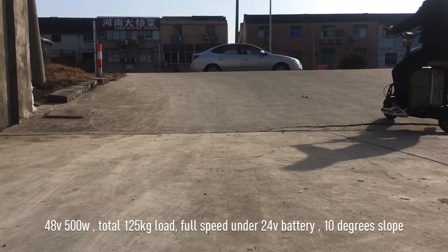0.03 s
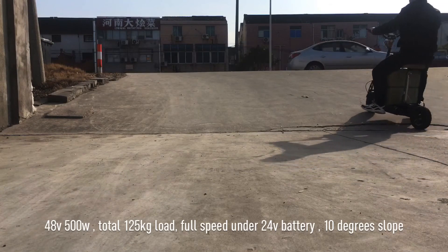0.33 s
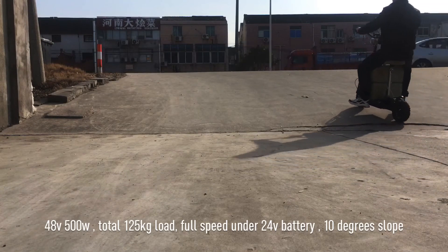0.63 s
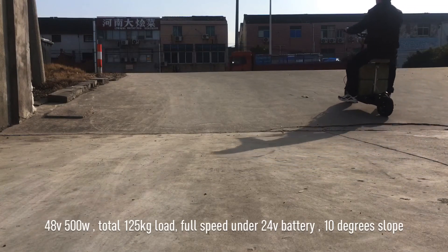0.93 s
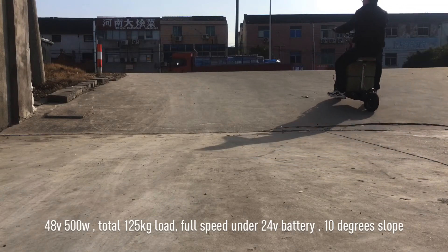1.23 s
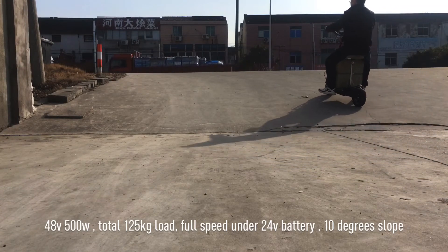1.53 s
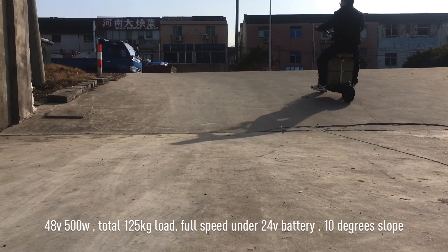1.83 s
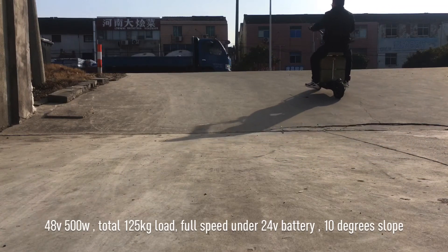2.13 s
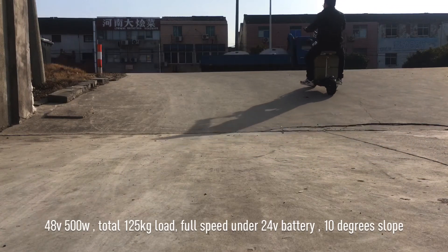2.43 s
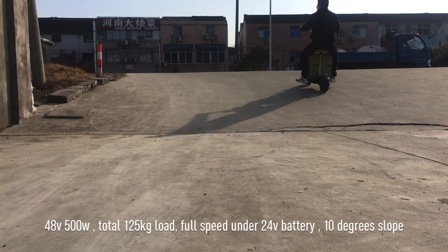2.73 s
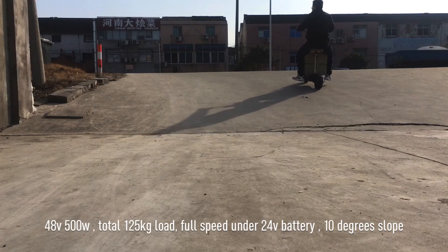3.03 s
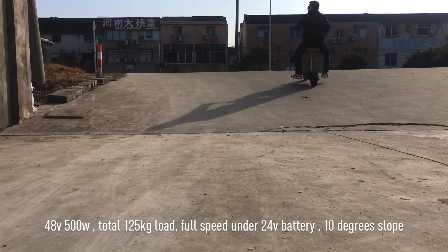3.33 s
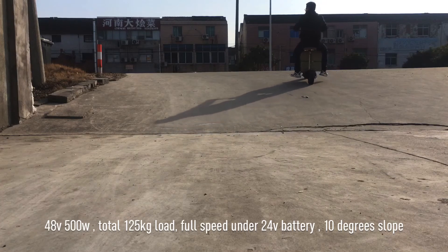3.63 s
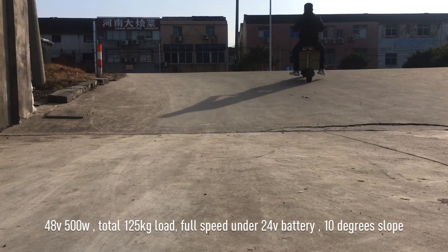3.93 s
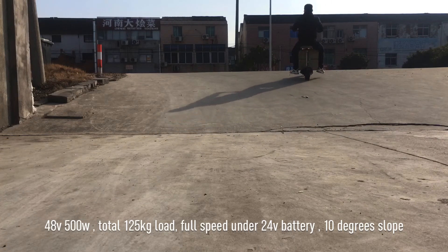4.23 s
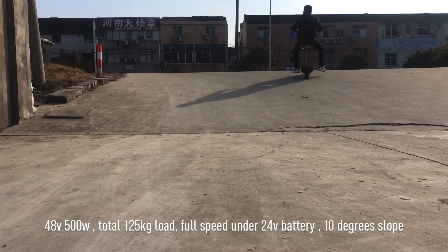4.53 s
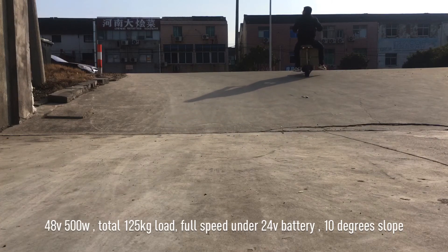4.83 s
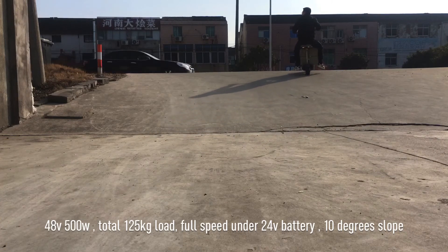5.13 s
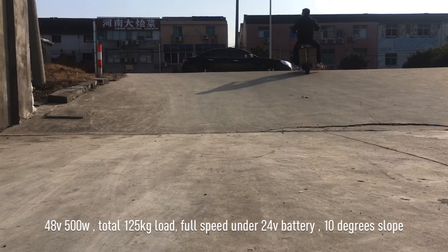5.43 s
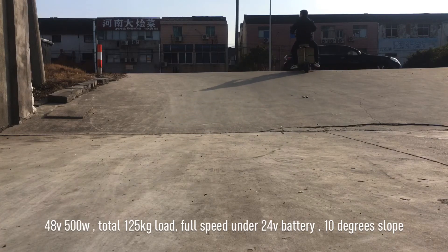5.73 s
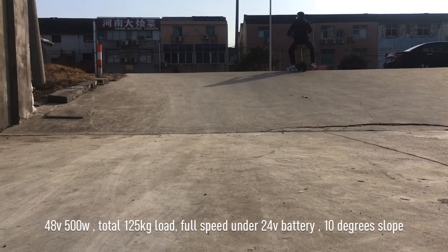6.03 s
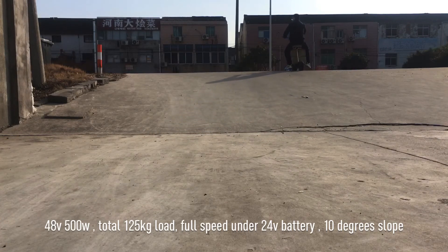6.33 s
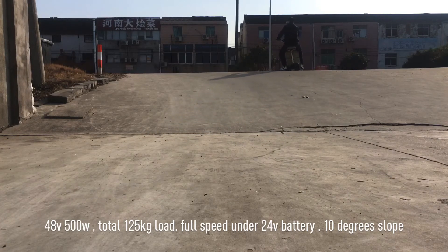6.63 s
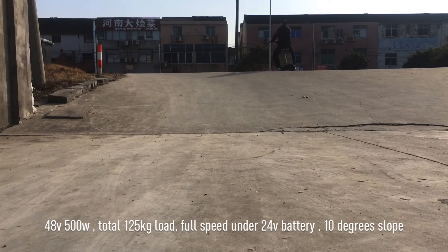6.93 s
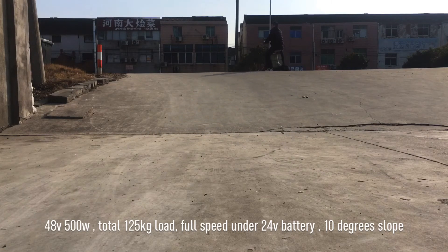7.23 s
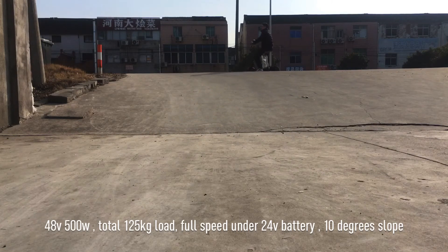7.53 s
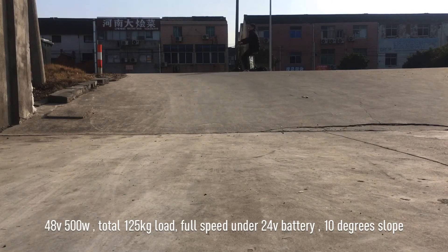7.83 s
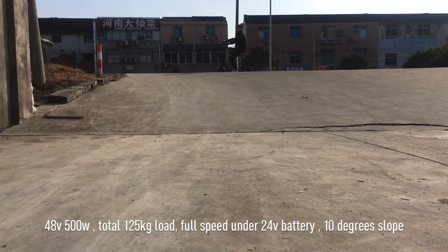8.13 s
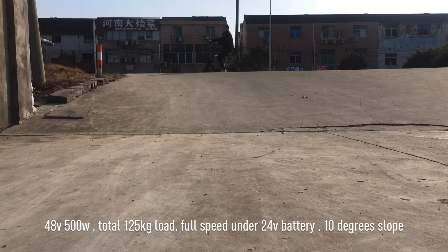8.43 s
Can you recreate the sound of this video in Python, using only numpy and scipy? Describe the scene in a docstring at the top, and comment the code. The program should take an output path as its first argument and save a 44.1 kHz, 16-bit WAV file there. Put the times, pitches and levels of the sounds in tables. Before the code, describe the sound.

A low rumble of passing traffic fills the open air, with deep diesel drones, swells of tyre noise and brief humming tones from gears and motors. Six dry clicks stand out at even intervals, the third the loudest. Beneath them a small electric scooter whines very faintly as it moves away from the microphone, and loose parts give slight, bright rattles. Later a car's tyres sing as it goes by.

```python
"""Traffic on a busy road: diesel engines drone and beat; cars and a light truck pass with tyre roar.
Treads, gears and motors sing in narrow lines; air sprays from the nearest tyres.
A small electric scooter climbs a concrete ramp towards the road: its windings whine faintly and recede.
Loose parts rattle, thin squeaks come and go, and a sharp, dry tick falls about every 1.3 s."""
import sys
import numpy as np
from scipy import signal
from scipy.fft import rfft, irfft, next_fast_len
from scipy.io import wavfile
from scipy.ndimage import uniform_filter1d, map_coordinates

SR = 44100
rng = np.random.default_rng(int(sys.argv[2]) if len(sys.argv) > 2 else 0)


def wav_out(sig):
    """Save sig, one row per channel (or a flat mono array), as 16-bit PCM at SR to the path in sys.argv[1]."""
    wavfile.write(sys.argv[1], SR, np.round(np.clip(np.atleast_2d(sig).T, -1, 1) * 32767).astype(np.int16))


N = 373968
TIME_S = np.arange(N) / SR

# distant heavy diesel under load: time_s, level_db
HEAVY_DIESEL = [(0, -17.5), (.25, -14), (1.16, -14), (1.6, -34), (1.89, -41), (2.1, -26), (2.55, -17),
                (2.78, -45), (2.97, -28), (3.35, -20.5), (3.52, -36), (3.72, -20.5), (5.25, -23),
                (5.7, -33), (5.93, -21), (6.38, -45.5), (6.56, -24), (7.55, -39.5), (8.48, -26)]
# lorry engine drone: time_s, firing_hz, level_db
LORRY_DRONE = [(0, 64.8, -34), (.27, 63.57, -27), (1.03, 63.3, -34.5), (1.4, 63.96, -24), (2.55, 63.6, -21),
               (2.76, 62.5, -25.5), (3, 61.44, -21.5), (3.45, 60.27, -30.5), (3.8, 59.65, -29),
               (4.3, 60.72, -30), (4.46, 62.28, -20.5), (5.7, 62.46, -21.5), (7.6, 63, -24.5),
               (8.48, 63.6, -26)]
# other engines: peak_s, half_length_s, firing_hz, glide_hz_per_s, level_db
PASSING_ENGINES = [(0.042, 0.31, 71.6, 2, -26.5), (1.85, 0.8, 78.3, 0.44, -31),
                   (4.102, 0.58, 87.9, 0.5, -39.5), (4.684, 0.41, 57.6, -7.5, -23.5),
                   (5.686, .45, 73, 1, -31), (5.894, .9, 52, -1, -35.5), (6.285, 0.32, 103, -3, -41),
                   (7.051, 0.4, 92.7, -8, -29), (7.724, .14, 80.9, -10, -27.5), (7.705, 0.2, 73.2, -2, -25),
                   (8.403, 0.33, 71.76, -2, -27.5)]
# vehicles going by: nearest_s, half_power_s, body_db, roar_db, tread_db, hiss_db, fizz_db
PASS_BYS = [(0.0, 0.23, -29, -40.5, -41.5, -53, -68.5), (0.6, 0.69, -34, -42, -36, -53.5, -64.5),
            (1.45, 0.48, -34, -49.5, -45, -54, -73.5), (2.25, 0.27, -37.5, -31.5, -37.5, -50, -71),
            (3.05, .42, -30.5, -32.5, -34.5, -50, -69.5), (3.65, 0.25, -29, -38, -45.5, -58.5, -76.5),
            (4.3, 0.66, -36.5, -42, -42.5, -56, -77), (5.65, .5, -44, -43, -41, -60, -76),
            (6.2, 0.28, -37, -39.5, -40.5, -64.5, -79.5)]
# steady far traffic: body_db, roar_db, tread_db, hiss_db, fizz_db
FAR_WASH_DB = [-38.5, -44, -44.5, -63, -75.5]
# road noise spectra: freq_hz, gain_db
RUMBLE_SPECTRUM = [(12, -19.5), (24, -2.5), (36, 0.5), (55, 5.5), (85, 4.5), (110, -6.5), (135, -5.5),
                   (180, -29)]
BODY_SPECTRUM = [(85, -28.5), (125, 0.5), (170, 0), (230, 1.5), (320, -1), (400, -5.5), (480, -11),
                 (700, -43)]
ROAR_SPECTRUM = [(280, -24.5), (410, -7), (500, 0.5), (630, 1), (800, -2.5), (950, -4), (1400, -40.5)]
TREAD_SPECTRUM = [(600, -38.5), (820, -7.5), (1020, -0.5), (1250, -3.5), (1600, -6.5), (2000, -12.5),
                  (2400, -19.5), (3200, -30), (5000, -58.5)]
HISS_SPECTRUM = [(1500, -24.5), (2400, 5.5), (3000, 2), (3700, -1), (4600, -3.5), (5000, -12.5),
                 (6600, -13), (7600, -22.5), (10000, -36)]
FIZZ_SPECTRUM = [(3000, -23), (5500, 5.5), (7500, -1.5), (9500, -0.5), (10400, -6), (11500, -4),
                 (13500, -9), (15800, -12.5)]
# tread, gear and motor tones: peak_s, half_length_s, pitch_hz, glide_hz_per_s, level_db
SINGING_LINES = [(0.3, .6, 2090, -30, -50.5), (0.699, 0.52, 1670, -20, -50), (0.852, 0.53, 281.7, -12, -37),
                 (1.5, .35, 172, 0, -33.5), (2.253, 0.23, 349, -10.5, -35.5),
                 (3.031, 0.16, 340.4, -17, -30), (3.05, 0.68, 335, -17, -36),
                 (3.499, 0.71, 182.3, -16.5, -34.5), (3.501, .65, 1940, -49.5, -51),
                 (4.5, .8, 384.8, -10, -42.5), (4.203, 0.11, 922, 0.5, -45), (4.25, .45, 315.3, -11, -36.5),
                 (4.697, 0.093, 982.4, 0, -42), (6.5, .15, 986, -0.5, -38.5), (6.98, .18, 993, -1, -42.5),
                 (7.2, 1.5, 201.1, 0, -42), (7.8, .2, 282.3, -6, -38)]
# dry ticks: start_s, level_db
TICK_HITS = [(0.3293, -18), (1.6297, -28), (2.9532, -15), (4.2767, -24.5), (5.6005, -29), (6.9241, -34.5)]
# tick spectrum: freq_hz, gain_db
TICK_SPECTRUM = [(300, 4), (3000, -2), (6000, -3), (9000, -7.5), (12000, -13.5), (14000, -19.5),
                 (15500, -39.5)]
# scooter and truck rattles: start_s, level_db, pitch_hz
RATTLE_BURSTS = [(0.5967, -46.5, 9000), (2.066, -51.5, 12500), (2.194, -51, 11500), (2.257, -51, 11800),
                 (2.386, -51.5, 12500), (3.5875, -47, 8150), (3.7845, -50.5, 10000), (5.106, -48, 7510),
                 (6.079, -59, 12370), (6.3207, -47, 6800), (6.4152, -52, 6640), (6.5554, -52, 5976),
                 (6.866, -53, 6460), (6.8827, -47, 6400), (7.787, -52, 7560), (8.2477, -57, 7060)]
# air from the nearest tyres: peak_s, half_length_s, level_db
SPRAY_SURGES = [(2.2, 0.37, -54), (2.87, 0.34, -54), (5.803, .6, -65)]
# spray spectrum: freq_hz, gain_db
SPRAY_SPECTRUM = [(3000, -26.5), (4400, 5), (5600, -1), (6800, -3.5), (8000, -12), (10200, -17.5),
                  (11200, -12.5), (13000, -16), (15000, -26)]
# thin squeaks: peak_s, pitch_hz, level_db, length_s
THIN_SQUEAKS = [(2.08, 7050, -58.5, 0.12), (2.99, 12000, -68, 0.061), (6.296, 14960, -68, .045),
                (6.37, 14900, -74, .05), (7.772, 15100, -79, .05)]
# one car's tread resonance: time_s, pitch_hz, level_db
GROOVE_RESONANCE = [(4.2, 1130, -70), (5.1, 1119, -46), (5.7, 1114, -41.5), (6.2, 1152, -37.5),
                    (6.5, 1080, -41), (6.9, 1053, -44.5), (7.5, 1065, -46.5), (8.48, 1049, -53)]


def amp(db):
    """Decibels to gain."""
    return 10 ** (np.asarray(db) / 20)


def unit(x):
    """Scale to rms 1."""
    return x / np.sqrt(np.mean(x ** 2) + 1e-20)


def curves(rows):
    """Per-sample curve of each column after the time."""
    times_s, *columns = np.transpose(rows)
    return [np.interp(TIME_S, times_s, column) for column in columns]


def wobble(rate_hz):
    """Smooth random curve, rate_hz knots a second."""
    knots = rng.standard_normal(int(N * rate_hz / SR) + 4)
    return map_coordinates(knots, [TIME_S * rate_hz])


def swell(peak_s, half_s):
    """Gaussian gain, 1/e at half_s from the peak."""
    return np.exp(-((TIME_S - peak_s) / half_s) ** 2)


def pass_power(nearest_s, half_power_s):
    """Power of a source on a straight road, 1 when nearest."""
    return 1 / (1 + ((TIME_S - nearest_s) / half_power_s) ** 2)


def glide(at_s, hz, hz_per_s):
    """Linear pitch glide through hz at at_s."""
    return hz + hz_per_s * (TIME_S - at_s)


def tone(hz):
    """Sine of rms 1 on a pitch curve."""
    return np.sqrt(2) * np.sin(2 * np.pi * (np.cumsum(hz) / SR + rng.random()))


def filtered(x, response):
    """Apply a gain given as a function of frequency."""
    size = next_fast_len(N + 8192)
    return irfft(rfft(x, size) * response(np.fft.rfftfreq(size, 1 / SR)), size)[:N]


def coloured(x, spectrum):
    """Filter by (freq_hz, gain_db) points on a log axis."""
    freq_hz, gain_db = np.transpose(spectrum)
    log_hz = np.log(freq_hz)
    return filtered(x, lambda hz: amp(np.interp(np.log(hz + 1), log_hz, gain_db, left=-120, right=-120)))


def rush(spectrum, patchy_db):
    """Coloured noise of rms 1 with drifting patches of gain."""
    bins = signal.stft(rng.standard_normal(N), nperseg=1024)[2]
    patches = uniform_filter1d(rng.standard_normal(bins.shape), size=4, axis=0)
    patches = unit(uniform_filter1d(patches, size=14, axis=1))
    noise = signal.istft(bins * amp(patchy_db * patches), nperseg=1024)[1][:N]
    return unit(coloured(noise, spectrum))


def narrow_noise(hz, width_hz):
    """Noise band of rms 1 on a pitch curve."""
    size = next_fast_len(N)
    bell = np.exp(-np.log(4) * (np.fft.fftfreq(size, 1 / SR) / width_hz) ** 2)
    noise = rng.standard_normal(size) + 1j * rng.standard_normal(size)
    baseband = np.fft.ifft(np.fft.fft(noise) * bell)[:N]
    carrier = np.exp(2j * np.pi * np.cumsum(hz) / SR)
    return unit((baseband * carrier).real)


def heavy_diesel(firing_hz=43.96, trim_db=-1.4):
    """A labouring diesel; only its lowest firing order carries this far."""
    level_db, = curves(HEAVY_DIESEL)
    return amp(level_db + trim_db) * tone(np.full(N, firing_hz))


def lorry(octave_db=-34.5):
    """Drone at the firing rate; the second harmonic carries only from near by."""
    firing_hz, level_db = curves(LORRY_DRONE)
    drone = amp(level_db + 0.8 * wobble(6.6)) * tone(firing_hz)
    nearness = np.sqrt(pass_power(nearest_s=1.9, half_power_s=1.3))
    octave = amp(octave_db + 3 * wobble(6)) * tone(2 * firing_hz + 2.15 * wobble(8))
    return drone + nearness * octave


def passing_engines():
    """Firing tones swell, glide and beat against the other engines."""
    return sum(swell(peak_s, half_s) * amp(db) * tone(glide(peak_s, firing_hz, hz_per_s))
               for peak_s, half_s, firing_hz, hz_per_s, db in PASSING_ENGINES)


def road_noise(bump_db=0.5):
    """Bodies boom, tread blocks roar, air hisses from under tyres; pass-bys add to the far wash."""
    power = amp(FAR_WASH_DB)[:, None] ** 2
    for nearest_s, half_power_s, *layers_db in PASS_BYS:
        power = power + amp(layers_db)[:, None] ** 2 * pass_power(nearest_s, half_power_s)
    body_db, roar_db, tread_db, hiss_db, fizz_db = 10 * np.log10(power)
    rumble_db = -18.5 + 0.32 * body_db  # far traffic swells less than near
    rumble = amp(rumble_db) * rush(RUMBLE_SPECTRUM, patchy_db=1.5)
    body = amp(body_db + bump_db * wobble(8)) * rush(BODY_SPECTRUM, patchy_db=1.5)
    roar = amp(roar_db) * rush(ROAR_SPECTRUM, patchy_db=1.2)
    tread = amp(tread_db) * rush(TREAD_SPECTRUM, patchy_db=1.02)
    hiss = amp(hiss_db) * rush(HISS_SPECTRUM, patchy_db=1.36)
    fizz = amp(fizz_db) * rush(FIZZ_SPECTRUM, patchy_db=1.3)
    return rumble + body + roar + tread + hiss + fizz


def scooter_whine(start_hz=9920, sag_hz=520, sag_s=4.9, warble_hz=125, jitter_hz=75):
    """Windings sing at the drive's jittery switching rate, which sags and warbles under load."""
    early_db, early_end_s, early_ease_s = 3, .42, .05  # louder at first, dropping at 0.42 s
    drive_db, flutter_db, turn_away_db_per_s, distance_doubles_s = -63.3, 1.2, .7, .85
    early = np.clip((early_end_s - TIME_S) / early_ease_s + .5, 0, 1)
    level_db = drive_db + early_db * early - turn_away_db_per_s * TIME_S + flutter_db * wobble(30)
    distance = 1 + TIME_S / distance_doubles_s
    switching_hz = start_hz - sag_hz * (1 - np.exp(-TIME_S / sag_s))
    switching_hz += early * warble_hz * wobble(50) + jitter_hz * wobble(80)
    return amp(level_db) / distance * narrow_noise(switching_hz, width_hz=350)


def singing_parts(trim_db=-1, flutter_db=2.5, waver_hz=4, roughness=.55):
    """Treads, gears and motors sing in narrow lines, roughened by the uneven road."""
    out = np.zeros(N)
    for peak_s, half_s, pitch_hz, hz_per_s, db in SINGING_LINES:
        hz = glide(peak_s, pitch_hz, hz_per_s)
        line = unit(tone(hz + waver_hz * wobble(30)) + roughness * narrow_noise(hz, width_hz=35))
        out += swell(peak_s, half_s) * amp(db + trim_db + flutter_db * wobble(20)) * line
    return out


def ticks(trim_db=2):
    """Single dry spikes, no ring or echo."""
    spikes = np.zeros(N)
    for start_s, db in TICK_HITS:
        spikes[round(start_s * SR)] = -amp(db + trim_db)
    impulse_peak = coloured(signal.unit_impulse(N, "mid"), TICK_SPECTRUM).max()
    return coloured(spikes, TICK_SPECTRUM) / impulse_peak


def rattles(trim_db=-8, t60_s=.035, relative_width=0.2):
    """Loose metal parts chatter in short, bright bursts."""
    out, size = np.zeros(N + SR), 4096
    hz = np.fft.rfftfreq(size, 1 / SR)
    decay = amp(-60 * TIME_S[:size] / t60_s)
    for start_s, db, pitch_hz in RATTLE_BURSTS:
        band = 1 / (1 + ((hz - pitch_hz) / (relative_width * pitch_hz)) ** 2)
        chatter = unit(irfft(rfft(rng.standard_normal(size)) * band))
        out[round(start_s * SR):][:size] += amp(db + trim_db) * chatter * decay
    return out[:N]


def tyre_spray(trim_db=-1, flutter_db=0.78):
    """Air sprays from the nearest tyres in surges."""
    surges = sum(amp(db) * swell(peak_s, half_s) for peak_s, half_s, db in SPRAY_SURGES)
    air = unit(coloured(rng.standard_normal(N), SPRAY_SPECTRUM))
    return surges * amp(trim_db + flutter_db * wobble(25)) * air


def squeaks(trim_db=-4, waver=.008, flutter_db=3):
    """Thin, ragged squeaks swell and fade."""
    bend = 1 + waver * wobble(700)
    gain = amp(trim_db + flutter_db * wobble(180))
    return gain * sum(amp(db) * swell(peak_s, length_s / 2) * tone(pitch_hz * bend)
                      for peak_s, pitch_hz, db, length_s in THIN_SQUEAKS)


def tread_grooves():
    """A car's tread grooves ring like short pipes."""
    pitch_hz, level_db = curves(GROOVE_RESONANCE)
    return amp(level_db) * narrow_noise(pitch_hz, width_hz=240)


def scene():
    """Traffic, scooter and small noises in open air, mono."""
    engines = heavy_diesel() + lorry() + passing_engines()
    traffic = engines + road_noise() + singing_parts() + tyre_spray() + tread_grooves()
    return (traffic + scooter_whine() + ticks() + rattles() + squeaks())[None]


def record(dry):
    """Short fade at each end, then a brick-wall low-pass."""
    fade_s, cutoff_hz = .003, 15750
    fade = np.clip(np.minimum(TIME_S, TIME_S[::-1]) / fade_s, 0, 1)
    return filtered(dry[0] * fade, lambda hz: hz < cutoff_hz)[None]


dry = scene()
out = record(dry)
wav_out(out)
```